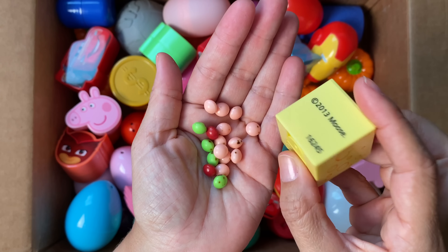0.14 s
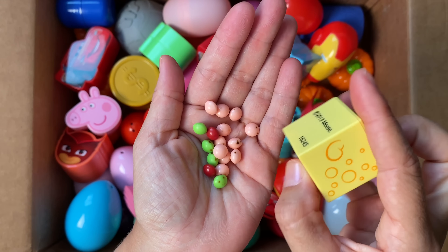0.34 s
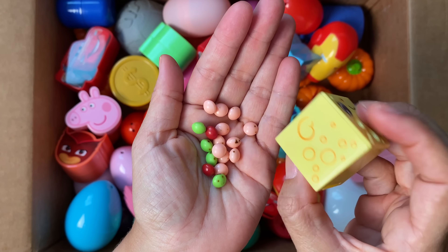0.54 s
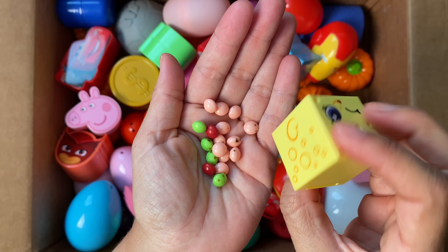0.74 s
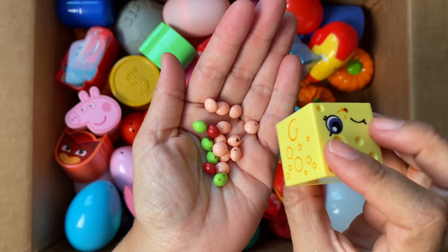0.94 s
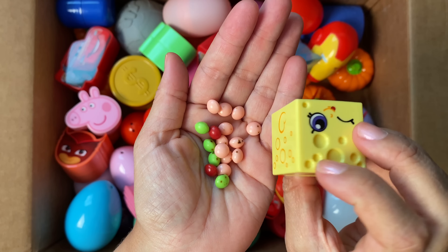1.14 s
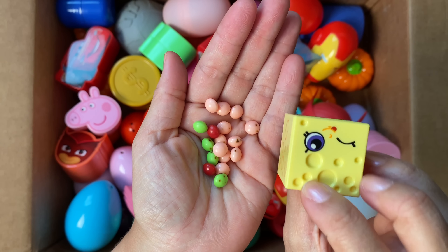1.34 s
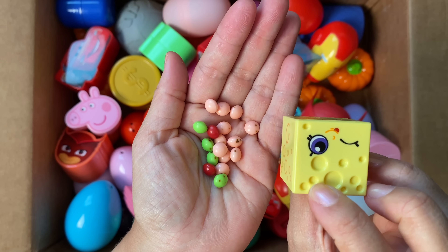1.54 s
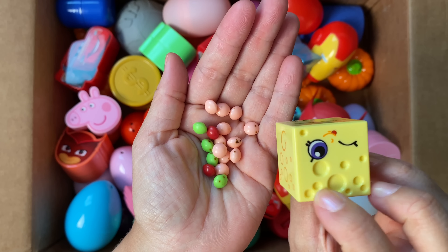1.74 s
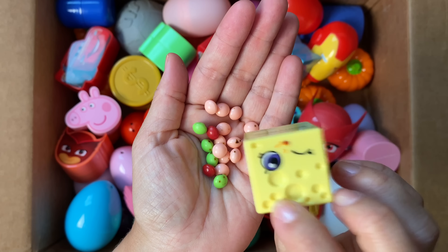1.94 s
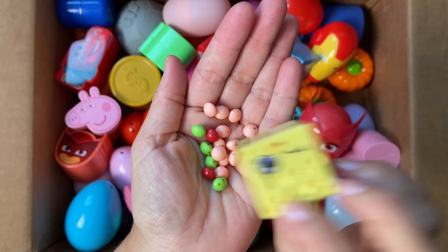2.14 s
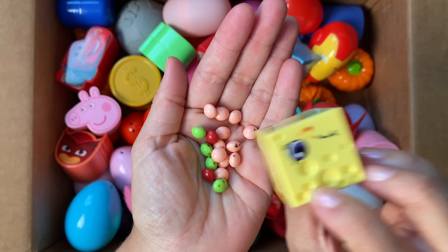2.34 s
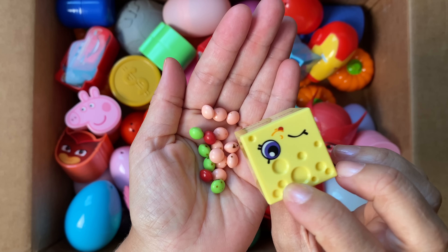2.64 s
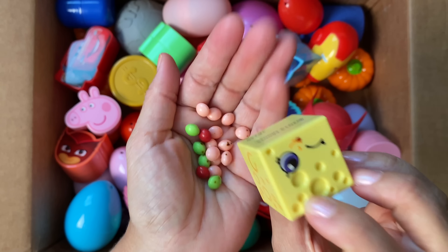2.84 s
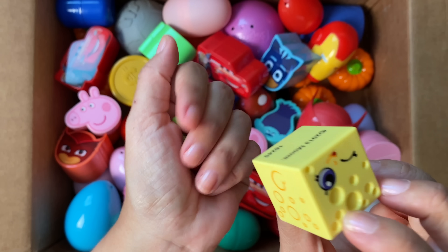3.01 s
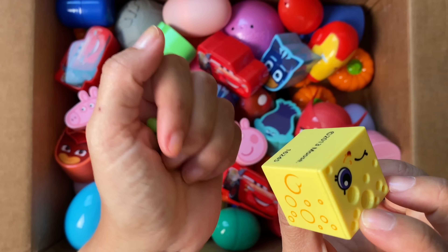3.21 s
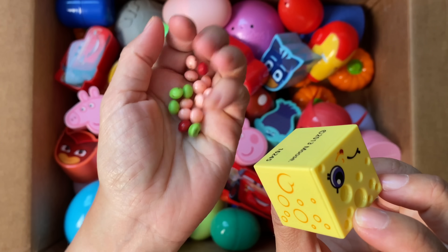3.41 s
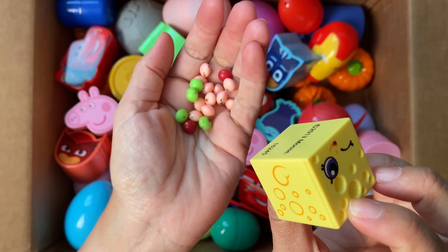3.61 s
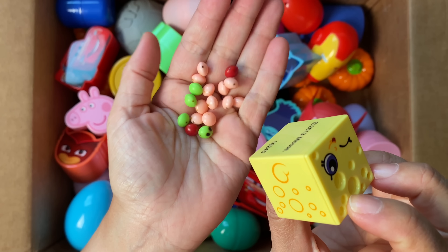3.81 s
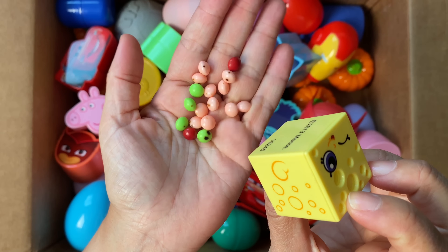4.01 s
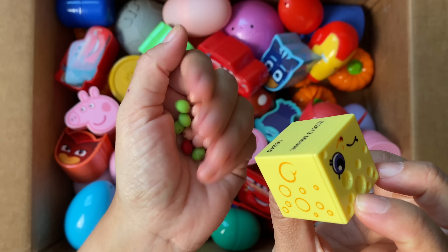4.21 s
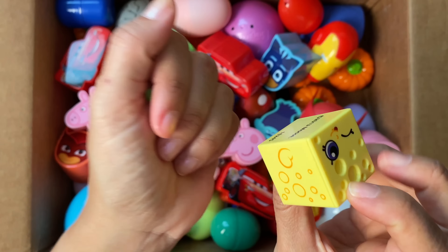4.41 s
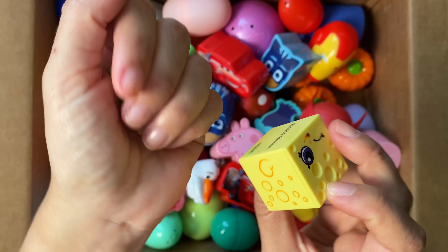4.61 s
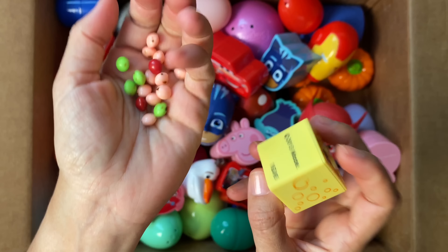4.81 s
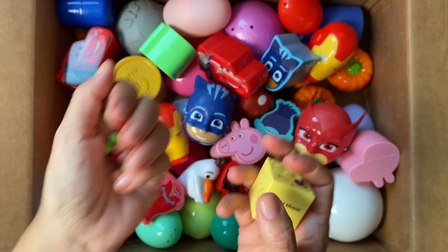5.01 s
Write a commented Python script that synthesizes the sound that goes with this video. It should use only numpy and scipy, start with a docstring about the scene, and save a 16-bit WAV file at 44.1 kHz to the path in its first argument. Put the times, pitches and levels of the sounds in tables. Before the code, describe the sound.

Close up in a small room, hollow plastic toys knock and chatter as a hand pushes through a cardboard box. Lively clacks thin to lighter clicks, then a loud, dense clatter breaks out around two seconds. A quieter pause follows, with tiny beads ticking and rolling in a palm and one dry snap. Toys rattle again near the end, with soft brushing on cardboard and a faint low hum beneath.

```python
"""Rummaging in a box of plastic toys

Hands push through hollow plastic toys in a cardboard box, close to a phone in a small, faintly humming room.
Shell knocks on shell: a hard click, a short noisy chatter and decaying modes, over many lighter contacts.
In the pause, beads tick and roll in a palm as short damped clicks, and the fingers open with one dry snap.
Filtered noise bursts bump the box, noise brushes the cardboard; a noise tail is the room, sines the hum."""
import sys
import numpy as np
from scipy import signal
from scipy.fft import rfft, irfft, next_fast_len
from scipy.io import wavfile

SR = 44100
rng = np.random.default_rng(int(sys.argv[2]) if len(sys.argv) > 2 else 0)


def log_audio(samples):
    """Write samples as a 16-bit WAV file to the path given in sys.argv[1]."""
    # one column per channel
    frames = np.atleast_2d(samples).T
    # limit to full scale, then quantise
    limited = np.clip(frames, -1, 1)
    pcm = np.round(limited * 32767).astype(np.int16)
    wavfile.write(sys.argv[1], SR, pcm)


N = 271215
GRAIN = 4096  # samples in one blow
TIME = np.arange(N) / SR
AGE = np.arange(GRAIN) / SR
CONTACTS_PER_S = 270


def undb(db):
    """Decibels to gain."""
    return 10 ** (np.asarray(db) / 20)


def curve(rows):
    """Gain over time from (s, dB) rows."""
    return undb(np.interp(TIME, *np.transpose(rows)))


def along(rows, size, axis=1):
    """One column of a table over the bins of an FFT, on a log-frequency axis."""
    rows = np.array(rows, float)
    bin_hz = np.arange(size // 2 + 1) * SR / size
    return np.interp(np.log(bin_hz + 1), np.log(rows[:, 0]), rows[:, axis])


def causal(db):
    """Minimum-phase response for a gain curve: nothing sounds before the blow."""
    cepstrum = irfft(np.log(undb(db)))
    half = len(cepstrum) // 2
    cepstrum[1:half] *= 2
    cepstrum[half + 1:] = 0
    return np.exp(rfft(cepstrum))


def tint(x, colour):
    """Filter by a (Hz, dB) colour, keeping the power of white noise."""
    size = 2 * next_fast_len(x.shape[-1] // 2 + 512, True)
    response = causal(along(colour, size))
    response = response / np.sqrt(np.mean(abs(response) ** 2))
    return irfft(rfft(x, size) * response)[..., :x.shape[-1]]


def scattered(size):
    """Two-channel noise, partly alike left and right."""
    # side against mid of scattered sound: freq_hz, side_db
    spread = [(60, -18), (250, -4.5), (600, 9.5), (1400, -4.5), (2200, 2), (3500, -7.5), (6000, -1.5),
              (8500, -1.5), (11000, -10), (14000, -9)]
    mid, side = rfft(rng.standard_normal((2, size)))
    share = undb(along(spread, size))
    return irfft(np.array([mid + share * side, mid - share * side]) / np.sqrt(1 + share ** 2), size)


def fade(t60, age=AGE):
    """Exponential decay by 60 dB in t60 seconds."""
    return np.exp(-np.log(1000) * age / t60)


def unit(x):
    """Scale to unit energy per channel."""
    return x / np.sqrt(np.mean(np.sum(x ** 2, axis=-1)))


def walk(rate):
    """A random drift with a spread near 1 and a new level every 1 / rate s."""
    levels = rng.standard_normal(1024)
    # sqrt(3/2) makes up for the spread lost by interpolating
    return np.sqrt(3 / 2) * np.interp(TIME * rate, np.arange(len(levels)), levels)


def add(out, s, db, grain):
    """Mix in a blow whose first 4 ms have the given RMS level."""
    start, attack = max(int(s * SR), 0), SR // 250
    part = grain[:, :max(N - start, 0)]
    out[:, start:start + part.shape[1]] += part * undb(db) / np.sqrt(np.mean(grain[:, :attack] ** 2))


def gestures(rows, attack_s, release_t60):
    """Strength of the movement over time: each gesture builds up, holds and dies away."""
    power = 0
    for start, length, db in rows:
        rise = np.clip(1 + (TIME - start) / attack_s, 0, 1) ** 2
        fall = fade(release_t60, np.maximum(TIME - start - length, 0))
        power = power + (undb(db) * rise * fall) ** 2
    return np.sqrt(power)


def crowd(blow, gain, rate, spread_db, count=24):
    """Many light contacts at uneven moments, shared among a few objects."""
    objects = [unit(blow()) for _ in range(count)]
    gaps, sizes, owners = rng.random((N // 50, 3)).T
    starts = (np.cumsum(3 * gaps ** 2) * SR / rate).astype(int)  # 3 u^2 has mean 1
    sizes = undb(spread_db * (2 * sizes - 1))
    sizes /= np.sqrt(np.mean(sizes ** 2) * rate / SR)  # gain then sets the RMS of the stream
    out = np.zeros((2, N + GRAIN))
    for start, size, owner in zip(starts[starts < N], sizes, owners):
        out[:, start:start + GRAIN] += size * gain[start] * objects[int(owner * count)]
    return out[:, :N]


def contact(click_t60, chatter_t60, chatter_db, grit_db=-4, mean_bounce_s=.0015, bounce_db=-5):
    """A hard click with a gritty edge and one quick rebound, then scatter among the things around it."""
    click = undb(grit_db) * unit(rng.standard_normal(GRAIN) * fade(click_t60))
    click[0] += 1
    click[int(SR * mean_bounce_s * (.5 + rng.random()))] += undb(bounce_db)
    chatter = scattered(GRAIN) * fade(chatter_t60)
    chatter = tint(chatter, [(200, -4.5), (7000, -1.5), (11000, -2), (15000, -13.0)])
    return click + undb(chatter_db) * unit(chatter)


def voiced(grain, body_db, edge_db):
    """Big hollow toys have more body; sharp corners have more edge."""
    body = [(1100, body_db / 4), (2200, body_db), (3600, body_db)]
    edge = [(5400, 0), (7000, 0), (10000, edge_db)]
    return irfft(rfft(grain) * causal(along(body + edge, GRAIN)))


def toys():
    """Clear knocks over the jostling of the pile, which follows the pushes of the hand."""
    # a hand pushes into the pile and the toys jostle: start_s, length_s, level_db
    pushes = [(0.065, 0.054, -29), (0.235, 0.0067, -37), (0.345, 0.049, -40.5), (0.52, 0.15, -38),
              (0.61, 0.049, -34), (0.78, 0.29, -54), (1.255, 0.16, -43), (1.855, 0.013, -43.5),
              (1.95, 0.16, -26), (2.195, 0.014, -25.5), (2.275, 0.018, -26.5), (2.375, 0.0088, -29.5),
              (2.44, 0.063, -34.5), (3.12, .23, -56), (4.26, 0.19, -70), (4.69, 0.046, -59),
              (4.785, .035, -31.5), (4.88, 0.13, -31.5), (5.295, 0.042, -62.5), (5.495, 0.052, -39),
              (5.675, 0.067, -32), (6.07, .08, -45.5)]
    # knocks that stand out: start_s, level_db, body_db (hollow, 3 kHz), edge_db (hard, 11 kHz)
    knocks = [(0.0099, -35, 2, -2), (0.0293, -23, 7, 5), (0.0541, -24, 6, 5), (0.0647, -17, 3, -2),
              (0.0755, -22, 7, 1), (0.0808, -21, -2, 0), (0.088, -26, 3, 3), (0.111, -26, 3, -1),
              (0.1374, -27, 0, 0), (0.2537, -33, 7, 7), (0.3015, -27, 3, 1), (0.3281, -33, 3, -2),
              (0.3367, -22, 4, 2), (0.3557, -26, 4, 6), (0.368, -19, 1, 2), (0.3902, -27, 2, 4),
              (0.4712, -22, -4, -2), (0.5285, -33, -1, -4), (0.5598, -22, 4, 2), (0.5703, -26, 2, 5),
              (0.608, -17, 2, 5), (0.6173, -16, 11, 5), (0.6397, -21, 3, 2), (0.6758, -30, 2, 2),
              (0.7648, -36, 2, 6), (0.7824, -37, 5, -8), (0.8019, -28, -9, -10), (0.8232, -30, 0, 1),
              (0.8301, -30, -5, -12), (0.85, -36, -9, -12), (0.8993, -24, -8, -8), (0.9405, -30, -10, -7),
              (0.9439, -33, -9, -10), (0.9651, -38, -3, -8), (0.9913, -39, -1, -4), (1.0915, -32, -5, -5),
              (1.1655, -38, -3, -4), (1.1718, -36, -5, -1), (1.1803, -26, -10, -7), (1.218, -39, -1, -5),
              (1.2395, -32, -2, -5), (1.2456, -27, 2, -5), (1.2519, -31, -9, -1), (1.2632, -30, 2, -8),
              (1.2759, -30, -3, -5), (1.2873, -29, -4, -3), (1.3112, -35, -1, -5), (1.3285, -35, -5, -12),
              (1.3503, -27, -2, 3), (1.4079, -26, -2, 3), (1.4181, -32, -5, -4), (1.4333, -33, -3, -6),
              (1.717, -66, -3, -6), (1.768, -62, -3, -6), (1.8487, -37, -1, -7), (1.8742, -37, 0, -1),
              (1.9139, -23, -9, -8), (1.9434, -12, -7, -1), (1.9556, -19, -5, -7), (1.971, -13, 0, -1),
              (1.9926, -15, -2, -3), (2.0264, -13, -2, -1), (2.035, -14, 16, 10), (2.0661, -20, -4, -5),
              (2.1003, -14, -6, -1), (2.1124, -11, -5, -3), (2.1216, -12, -13, -6), (2.1859, -26, -4, -4),
              (2.1958, -23, 2, 1), (2.2033, -22, 0, 1), (2.2878, -13, -10, -4), (2.2943, -19, 6, 6),
              (2.3627, -26, -4, -7), (2.3874, -23, 5, 5), (2.4361, -24, 2, 9), (2.4514, -29, -4, -5),
              (2.4698, -22, -3, 0), (2.5216, -25, -2, 2), (2.5539, -37, -10, -9), (2.6155, -44, 0, -13),
              (2.6482, -45, -1, -4), (3.1095, -41, -3, -1), (3.1465, -42, -8, 6), (3.1908, -31, -8, -5),
              (3.204, -27, -6, -1), (3.2391, -36, -4, -4), (3.3287, -31, -2, 2), (4.7429, -27, 4, 4),
              (4.7729, -28, -3, 2), (4.7996, -22, 7, 7), (4.806, -25, 3, 11), (4.8417, -27, 8, 6),
              (4.8651, -27, 12, 5), (4.8757, -26, -4, -2), (4.8801, -25, 0, 2), (4.8997, -27, 8, 4),
              (4.9237, -27, 2, 0), (4.9319, -24, -7, -5), (4.9646, -24, 0, 4), (4.9807, -22, 0, 1),
              (5.0193, -28, -1, 3), (5.074, -40, -8, 10), (5.1023, -40, 5, 8), (5.4491, -32, -4, -3),
              (5.4761, -25, -8, -6), (5.4883, -30, -2, -4), (5.5571, -35, 2, -7), (5.6543, -37, 3, -3),
              (5.6933, -26, -1, -2), (5.7175, -26, -3, -3), (5.7476, -27, 0, -1), (5.794, -31, 3, 2),
              (5.809, -35, -3, -2), (5.9565, -48, 3, -6), (6.0836, -32, 0, 0), (6.1229, -33, -6, -5)]
    strength = gestures(pushes, attack_s=0.054, release_t60=.24)
    out = crowd(light_blow, strength, rate=CONTACTS_PER_S, spread_db=3.5)
    for s, db, body_db, edge_db in knocks:
        add(out, s, db, voiced(toy_blow(), body_db, edge_db))
    return hollows(out)


def toy_blow(ring_db=-7):
    """One plastic shell striking another: a coloured contact plus the ringing of the shell."""
    # colour of the clack: freq_hz, relative_db
    toy_colour = [(100, -51.5), (350, -34), (700, -28.5), (1400, -19.5), (1800, -12), (2250, -8),
                  (2800, -2), (3900, -7), (4700, -6), (5400, -4.5), (6100, 0), (7800, -10.5), (11500, -8),
                  (16000, -25)]
    clack = tint(contact(click_t60=.005, chatter_t60=0.046, chatter_db=-3), toy_colour)
    clack = unit(irfft(rfft(clack) * own_shape()))
    return placed(clack + undb(ring_db) * shell_ring())


def light_blow(body_db=1, edge_db=-2):
    """A gentle touch has less edge than a knock."""
    return voiced(toy_blow(), body_db, edge_db)


def shell_ring(detune=0.0043, uneven_db=6, ring_scale=.8, skew=0.18):
    """Each blow meets another spot on another shell, so the modes shift and change in weight."""
    # modes of the plastic shells: mode_hz, relative_db, t60_s (before ring_scale)
    shell_modes = [(1312, -24, .05), (2215, -3.5, .04), (2190, -14.5, .064), (2745, 1.5, .048),
                   (2930, -7.5, .05), (3117, -.5, .022), (3335, -7.5, .06), (3536, -4, .023),
                   (3737, -10, .09), (4108, -17, .12), (5230, -3.5, .026), (5610, -5.5, .05),
                   (6020, -3, .04), (6220, -4.5, .05), (6030, 0, .048), (6220, -9, .085), (6570, -5, .065),
                   (6751, -7.5, .05), (10205, -13.5, .015)]
    hz, db, t60 = np.transpose(shell_modes)[:, :, None]
    shift, weight, turn, aim = rng.standard_normal((4, len(shell_modes), 1))
    cycles = hz * (1 + detune * shift) * AGE + turn
    ringing = np.exp(2j * np.pi * cycles) * fade(ring_scale * t60)
    # every mode radiates in its own pattern and reaches the two ports slightly out of step
    reach = undb(db + uneven_db * weight) * np.exp(1j * np.pi * skew * aim * np.array([1, -1]))
    swell = 1 - fade(0.0025)  # the blow takes a moment to spread over the shell
    return unit(swell * np.imag(reach.T @ ringing))


def own_shape(ripple_db=5.0, count=44):
    """Every toy has its own broad peaks and dips."""
    return causal(ripple_db * signal.resample(rng.standard_normal(count), GRAIN // 2 + 1))


def placed(grain, pan_db=0.2):
    """Each toy lies somewhere else in the box, a little nearer to one port."""
    return grain * undb(np.array([[.5], [-.5]]) * pan_db * rng.standard_normal())


def hollows(x, ease_s=0.043):
    """The knocks drive resonances of large shells while those are in the moving part of the pile."""
    # large hollow toys: start_s, stop_s, peak_hz, width_hz, boost_db
    hollow_toys = [(0, 0.2, 2100, 320, 6.5), (.3, 0.775, 2540, 400, 2.5), (0.055, 1.01, 680, 533, 7.5),
                   (1.9, 2.595, 2190, 88, 6.5), (1.9, 2.599, 2750, 80, 3.5), (1.9, 2.596, 6187, 102.3, 5.5),
                   (3.09, 3.4, 1440, 1377, 8), (4.7, 5.075, 2270, 250, 5), (4.7, 6.153, 3170, 337, 1.5)]
    out = x.copy()
    for start, stop, hz, width_hz, db in hollow_toys:
        touching = np.interp(TIME, [start - ease_s, start, stop, stop + ease_s], [0, 1, 1, 0])
        b, a = signal.iirpeak(hz, hz / width_hz, fs=SR)
        out += (undb(db) - 1) * signal.lfilter(b, a, x * touching)
    return out


def beads():
    """Beads tick and roll in the palm as it closes and opens; one dry snap as the fingers open."""
    # the palm closes or opens and the beads roll: start_s, length_s, level_db
    rolls = [(2.9, 0.075, -51), (3.29, 0.23, -44.5), (3.61, 0.074, -53), (4.06, 0.18, -52.5),
             (4.235, 0.03, -40.5), (4.57, 0.053, -46.5)]
    # bead ticks that stand out: start_s, level_db, body_db (3 kHz)
    ticks = [(2.9086, -40, -11), (2.9516, -42, -3), (3.0066, -50, -1), (3.365, -40, 12), (3.398, -42, 10),
             (3.4458, -38, 2), (3.499, -39, -2), (3.6628, -40, 0), (4.0354, -48, 3), (4.0695, -42, -6),
             (4.0795, -34, -2), (4.1448, -41, -4), (4.1905, -41, -8), (4.2063, -34, -2), (4.2115, -39, -9),
             (4.232, -42, -9), (4.2617, -38, 4), (4.2678, -34, -3), (4.3093, -40, 4), (4.3823, -40, 2),
             (4.4364, -51, -4), (4.4941, -46, 9), (4.5749, -46, 9), (4.6199, -37, 5), (4.7091, -47, 1)]
    # colour of the snap: freq_hz, relative_db
    snap_colour = [(80, -8), (250, 4.5), (1200, 1), (3000, -10), (7000, 4), (12000, 20), (16000, 7)]
    strength = gestures(rolls, attack_s=0.054, release_t60=0.21)
    out = crowd(bead_blow, strength, rate=CONTACTS_PER_S, spread_db=23.5)
    for s, db, body_db in ticks:
        add(out, s, db, voiced(bead_blow(), body_db, 0))
    snap = contact(click_t60=0.0025, chatter_t60=0.027, chatter_db=-1.5, bounce_db=-12)
    add(out, 3.5424, -30.5, tint(snap, snap_colour))
    return out


def bead_blow():
    """Two beads meet; the palm damps them at once."""
    # colour of the tick: freq_hz, relative_db
    bead_colour = [(400, -31.5), (1500, -34), (2600, -23), (4200, -24), (6800, -9.5), (8000, -8.5),
                   (10000, -2.5), (12500, -3), (14500, -8), (16500, -3)]
    tick = contact(click_t60=0.0015, chatter_t60=.016, chatter_db=1, bounce_db=-6)
    return unit(tint(tick, bead_colour))


def box(catch_db=3):
    """Dull bumps against the box or the hand, and a rustle as the hand catches and slides on cardboard."""
    # a hand brushing along the cardboard: time_s, level_db
    brush = [(5.6, -83.5), (5.76, -54.5), (5.92, -62), (6.02, -53), (6.15, -58.5)]
    # colour of the brushing: freq_hz, relative_db
    brush_colour = [(100, -9.5), (500, -3.5), (1000, -9.5), (2000, -9.5), (5000, -10), (14000, -27)]
    # dull bumps: start_s, level_db
    bumps = [(0.367, -50.5), (.617, -53.5), (1.944, -43), (1.971, -52), (2.026, -46.5), (2.066, -49),
             (2.112, -52.5), (2.202, -55), (2.288, -56.5), (4.8, -52.5), (5.82, -54.5), (6.07, -50)]
    # colour of the bumps: freq_hz, relative_db
    bump_colour = [(50, -10), (130, -0.5), (300, -1.5), (500, -4.5), (850, -6.5), (1500, -26), (4000, -46)]
    out = tint(scattered(N), brush_colour) * curve(brush) * undb(catch_db * walk(25))
    for s, db in bumps:
        bump = contact(click_t60=.02, chatter_t60=.06, chatter_db=-3, grit_db=11)
        add(out, s, db, tint(bump, bump_colour))
    return out


def room(x, wet_db, t60=0.33, first_s=0.0012):
    """The walls return a short tail with little top."""
    age = TIME[:SR // 2]
    onset = np.clip(age / first_s - 1, 0, 1)  # silent until first_s
    tail = scattered(len(age)) * fade(t60, age) * onset
    tail = unit(tint(tail, [(200, 3.5), (3200, 0.0), (6500, -4.0), (10000, -7.5), (15000, -10.5)]))
    return x + undb(wet_db) * signal.oaconvolve(x.mean(axis=0)[None], tail, axes=1)[:, :N]


def background(waver_db=2.0, drift_db=1):
    """Low room noise that drifts and a faint mains hum that wavers."""
    # mains hum: freq_hz, rms_db
    hum_lines = [(120, -80), (180, -91.5), (240, -77)]
    # room noise: time_s, level_db
    air = [(0, -66), (1.6, -68), (2.8, -73), (4.3, -69), (4.8, -65), (6.15, -68)]
    # colour of the room noise: freq_hz, relative_db
    air_colour = [(18, -42), (35, -15), (55, 5), (80, 1), (110, -10), (300, -6.5), (500, -9.5), (1000, -22),
                  (1600, -13.5), (2400, -31.5), (5000, -35), (10000, -46), (16000, -45.5)]
    hum = 0
    for hz, db in hum_lines:
        level = np.sqrt(2) * undb(db + waver_db * walk(21))
        hum = hum + level * np.sin(2 * np.pi * (hz * TIME + rng.random()))
    return tint(scattered(N), air_colour) * curve(air) * undb(drift_db * walk(3.1)) + hum


def scene():
    """The beads are held nearer to the phone than the box, so they sound drier."""
    return room(toys() + box(), wet_db=-12.5) + room(beads(), wet_db=-13) + background()


def record(dry):
    """The phone's two ports differ in phase and level; the top is cut."""
    # the two ports: freq_hz, left_lead_rad, left_minus_right_db
    ports = [(60, 0, 0), (400, -.7, 3), (950, -.9, -5), (1350, .3, 0), (2000, .3, -.5), (3100, 1.4, -2.5),
             (4100, 1.1, -1), (4750, 2.9, -4), (5300, 6.2, 1), (6100, 7, 0), (9000, 8, -.3),
             (13000, 9.3, 0), (16500, 9.4, 0)]
    size = 2 * next_fast_len(N // 2 + GRAIN)
    lead, balance_db = along(ports, size, axis=1), along(ports, size, axis=2)
    sides = np.array([[.5], [-.5]])
    response = undb(sides * balance_db) * np.exp(1j * sides * lead)
    heard = irfft(rfft(dry, size) * response)[:, :N]
    top_hz = 16300
    return signal.sosfilt(signal.ellip(8, .2, 70, top_hz, fs=SR, output="sos"), heard)


dry = scene()
out = record(dry)
log_audio(out)
```